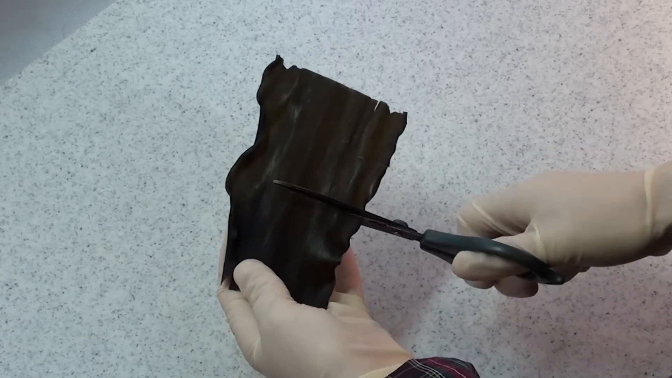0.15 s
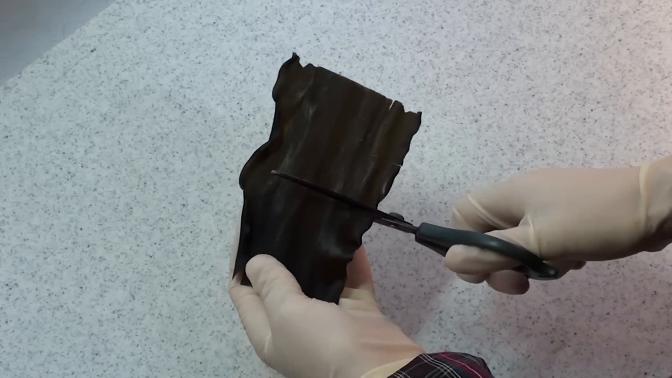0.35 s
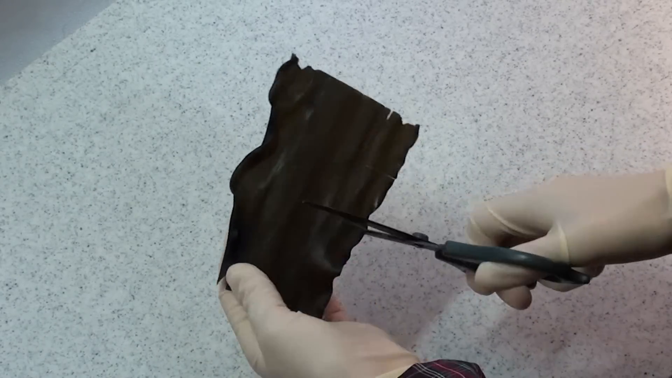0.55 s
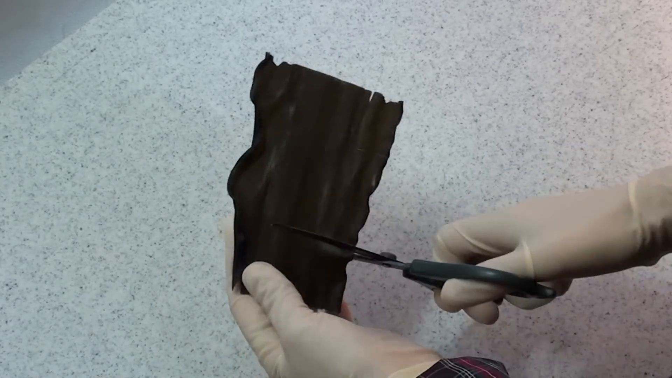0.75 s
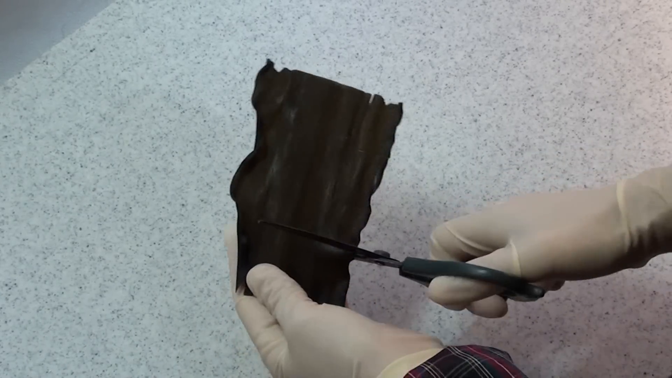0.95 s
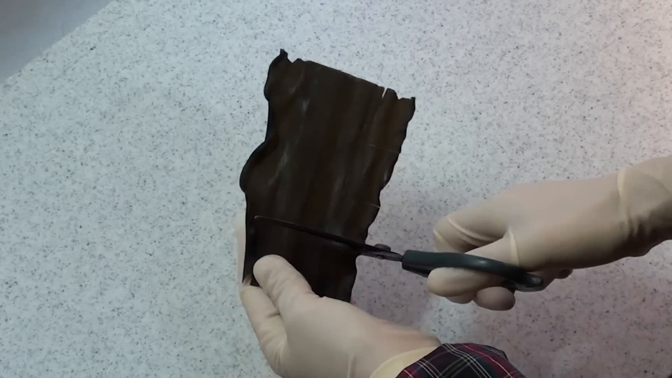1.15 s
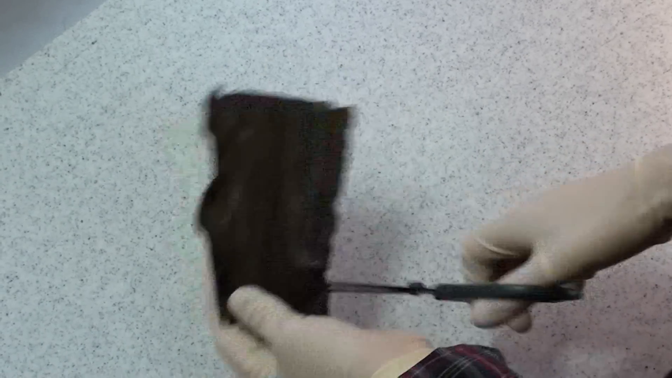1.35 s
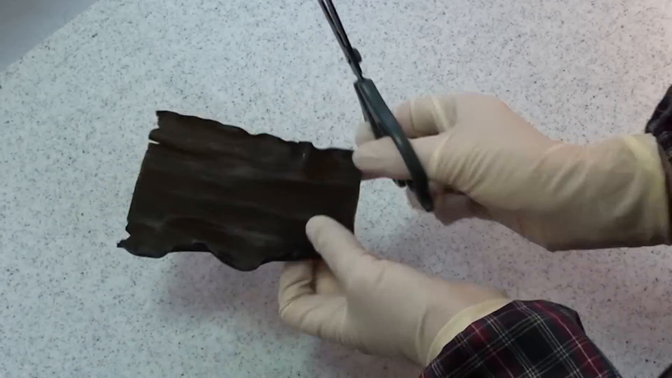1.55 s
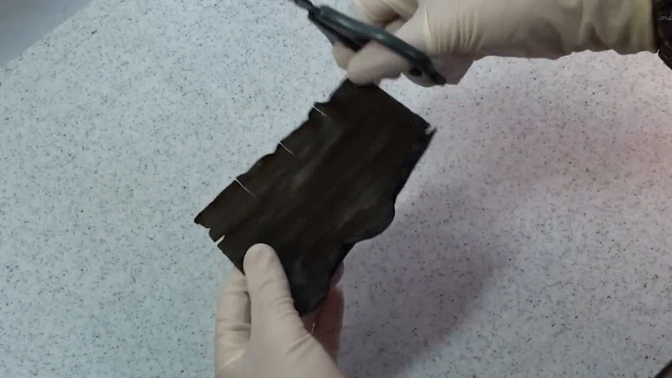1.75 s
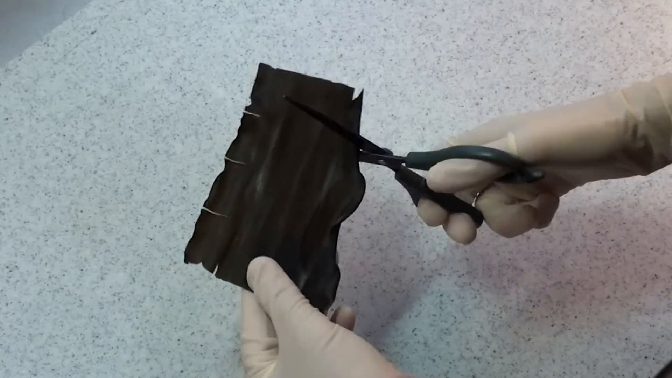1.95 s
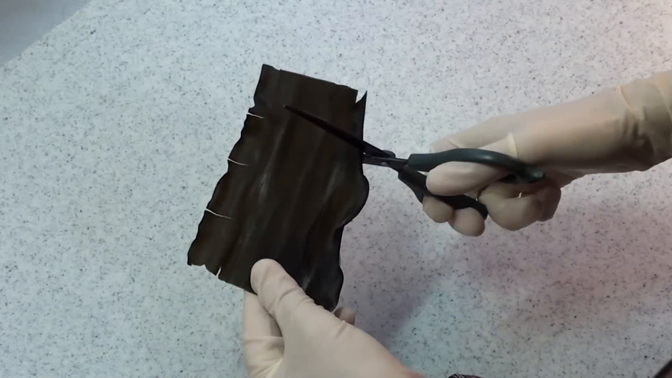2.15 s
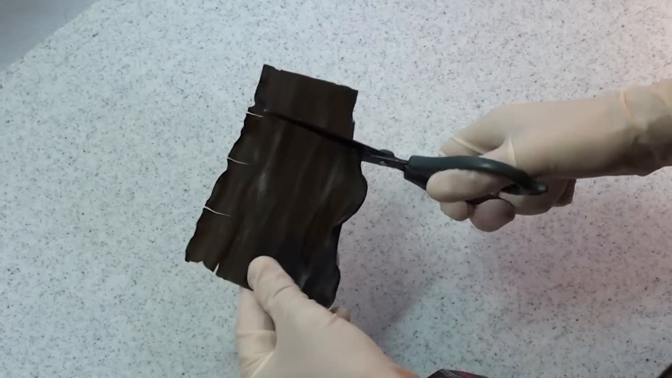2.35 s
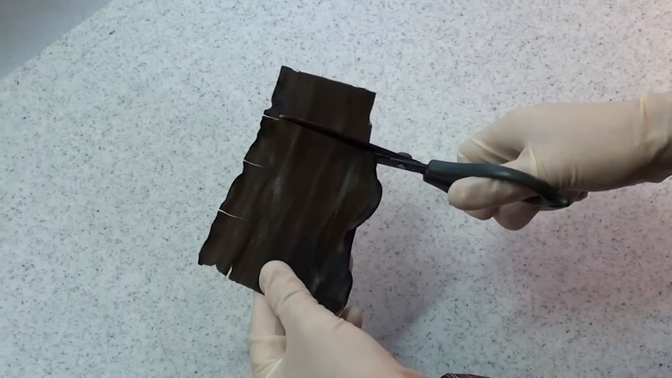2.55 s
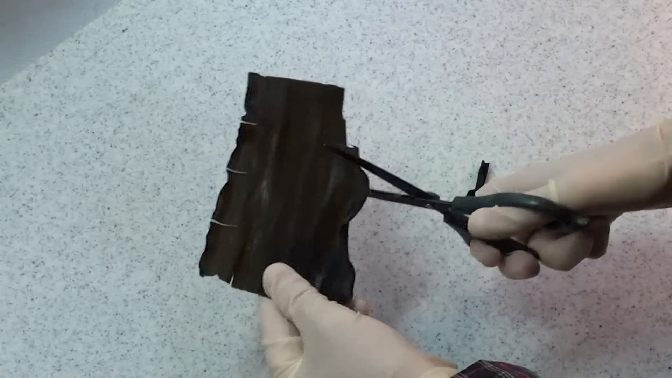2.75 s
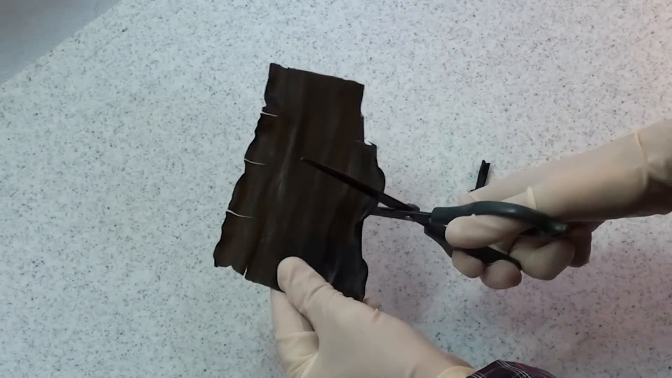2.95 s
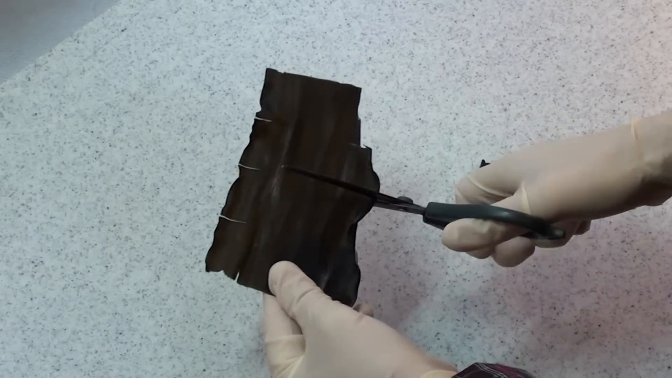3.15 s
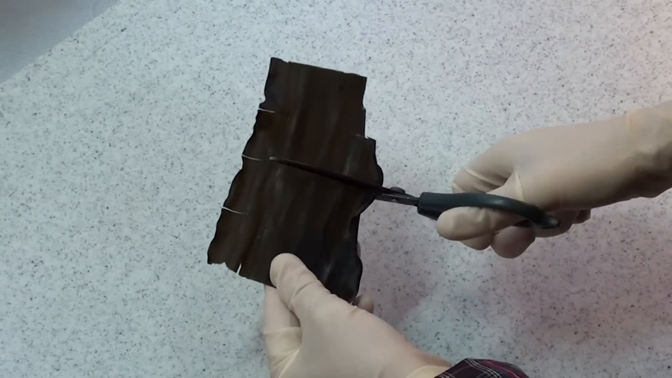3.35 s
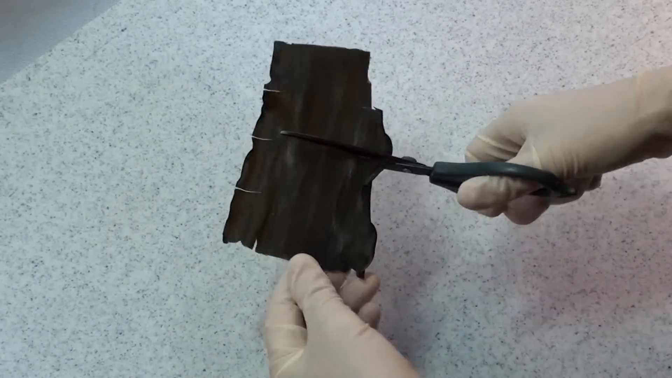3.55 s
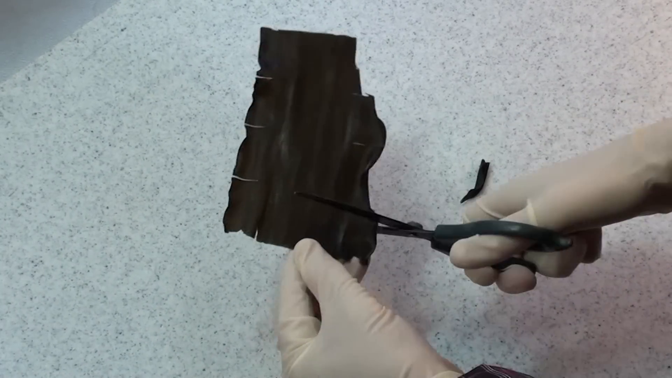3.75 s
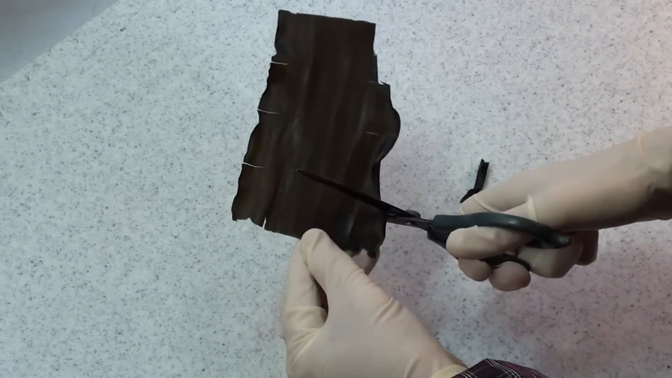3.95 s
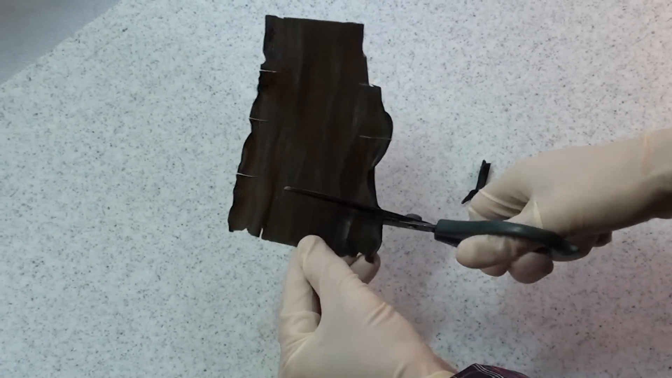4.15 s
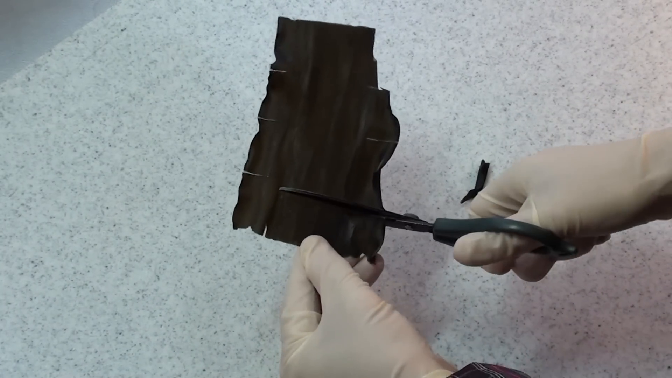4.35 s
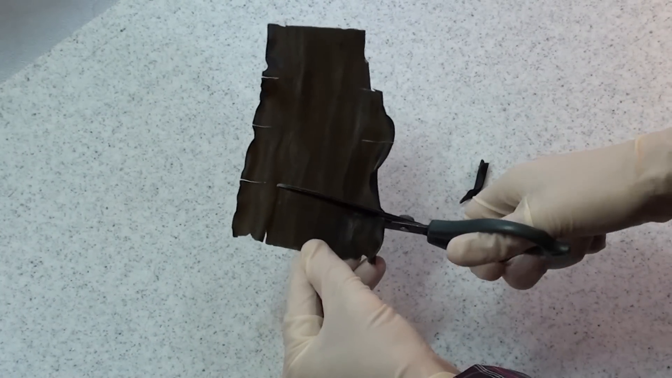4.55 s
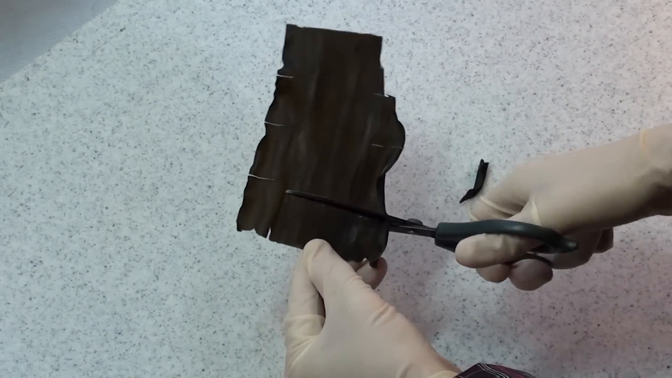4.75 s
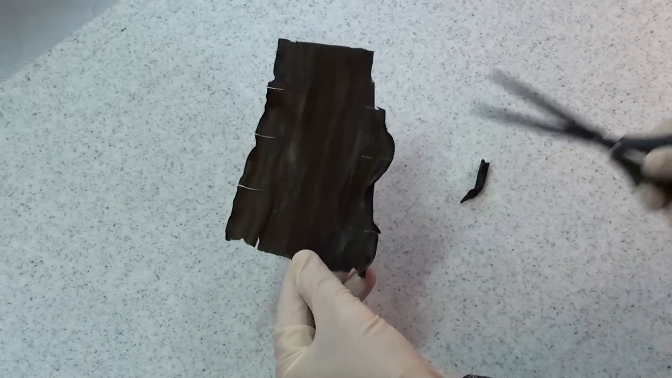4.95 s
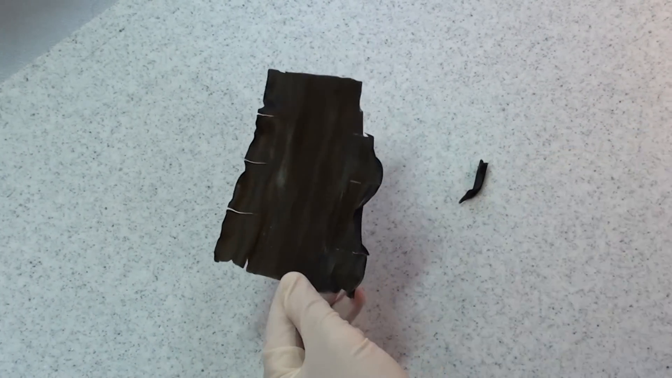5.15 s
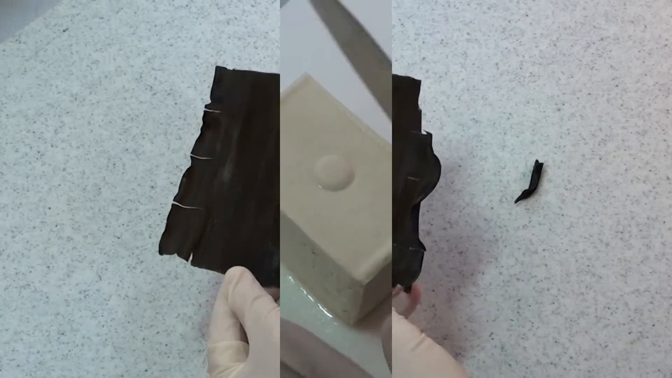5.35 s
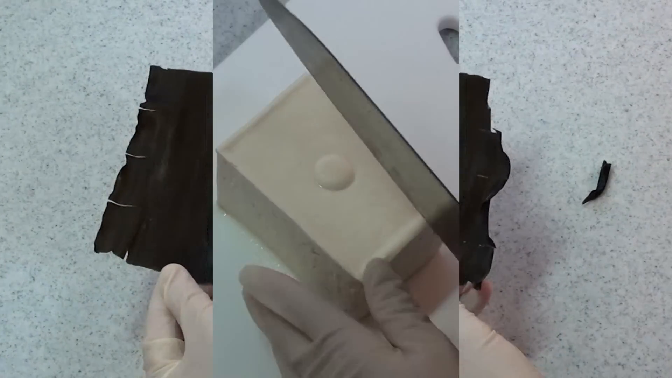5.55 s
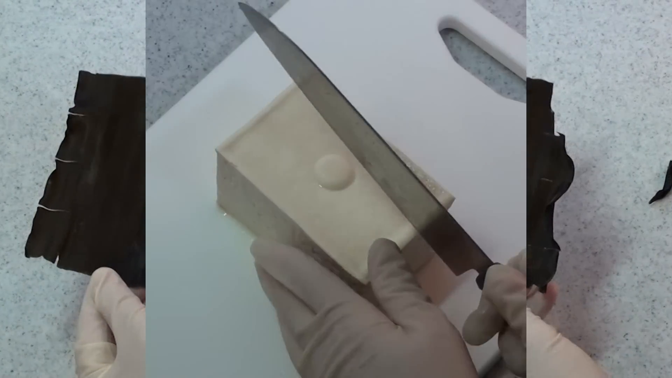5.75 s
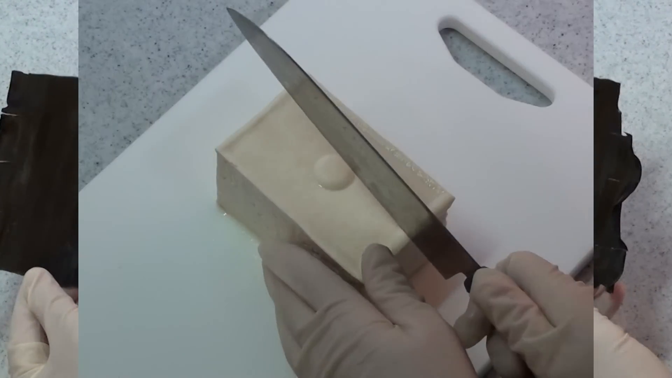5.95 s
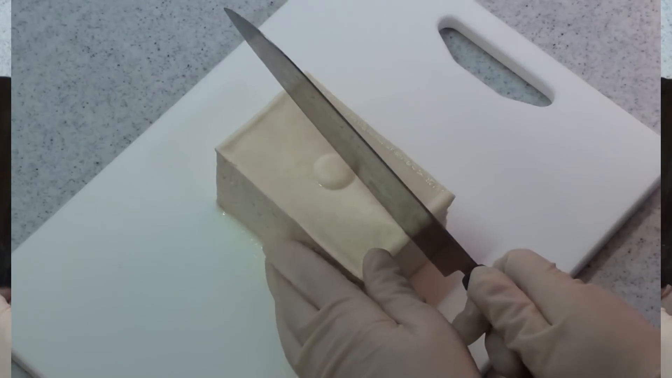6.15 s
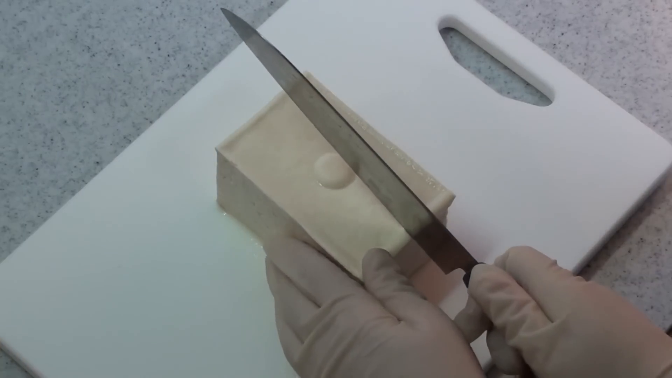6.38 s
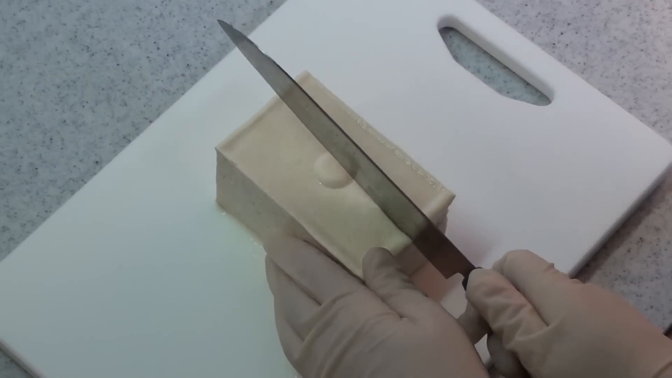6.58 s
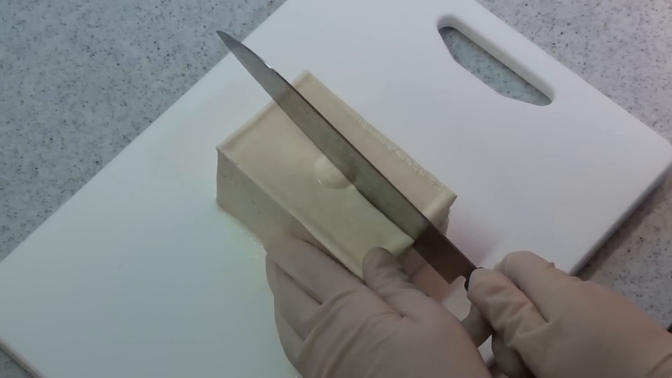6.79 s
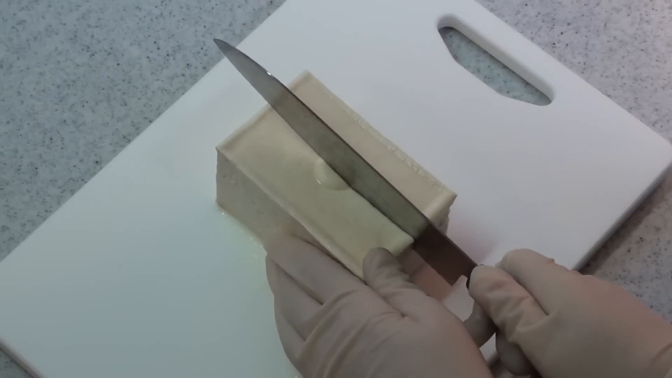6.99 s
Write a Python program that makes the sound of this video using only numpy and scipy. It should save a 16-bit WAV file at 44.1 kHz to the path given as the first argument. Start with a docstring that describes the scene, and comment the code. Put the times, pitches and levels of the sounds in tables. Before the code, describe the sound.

Scissors snip stiff dried kelp in crisp irregular clicks and crackles over quiet kitchen hum and hiss, then a brief slide and knock on a board.

```python
"""A kitchen, scissors and stiff dried kelp at close range to a camera's stereo microphone.
Fibres crack in clusters: bursts of micro-snaps ring the blades and the sheet, which rustles in the gloves.
A fridge hums and a thin whine stands over the microphone hiss, built from sines and coloured noise.
After a cut to a new shot the room is fuller in the bass; something slides over a cutting board as noise,
and knocks ring the board twice before a last light click."""
import sys
import numpy as np
from scipy import signal
from scipy.fft import rfft, irfft, next_fast_len
from scipy.io import wavfile
from scipy.ndimage import uniform_filter1d, map_coordinates

SR = 44100
rng = np.random.default_rng(int(sys.argv[2]) if len(sys.argv) > 2 else 0)


def waveform_to_disk(signal):
    """Save audio, clipped to [-1, 1], as 16-bit WAV at the path in sys.argv[1]."""
    frames = np.transpose(np.atleast_2d(signal))
    scaled = np.clip(frames, -1, 1) * 32767
    samples = np.round(scaled).astype(np.int16)
    wavfile.write(sys.argv[1], SR, samples)


def makeup_ratio(level_db):
    """Linear amplitude ratio for a level in decibels (20 dB per factor of ten)."""
    decades = np.asarray(level_db, float) / 20
    return 10 ** decades


N = 309582  # length in samples

# clear cracks: [t/s, blade knock level/dB, snap level/dB, fizz level/dB, length/ms], levels before the tilt
CRACKS = [(0.1386, -46, -51.5, -61, 3.5), (0.1671, -49.5, -62, -65, 1.5), (0.2163, -57, -60.5, -80, 4.7),
          (0.2693, -48, -53, -82, 2.3), (0.316, -47, -55, -62, 9.3), (0.321, -54, -48, -50, 5.6),
          (0.4846, -79, -53, -50, 3.8), (0.5431, -65, -29, -30, 1.15), (0.5448, -30, -35.5, -39, 2.4),
          (0.6251, -63, -42.5, -42, 3.3), (0.6695, -52, -61, -45, 1.9), (0.7208, -32, -31, -29.5, 1.13),
          (0.8247, -34.5, -54, -66, 1.27), (1.021, -33.5, -28.5, -23.5, 2.4),
          (1.0314, -39.5, -31, -52, 8.5), (1.0364, -26, -42, -20, 2), (1.0398, -46, -28, -46, 2.5),
          (1.0554, -61, -60, -46, 8.6), (1.0857, -29.5, -30.5, -34, 1.76), (1.146, -50.5, -55, -64, 6.5),
          (1.154, -48.5, -49, -70, 12), (1.2117, -33, -51, -41, 4.2), (1.2188, -37, -36.5, -69, 2.6),
          (1.2293, -34.5, -47, -52, 3.1), (1.236, -46, -51, -61, 4), (1.2598, -58, -32, -56, 2.3),
          (1.2652, -29.5, -54, -35, 1.7), (1.306, -36, -39, -44, 2.7), (1.3754, -46, -46, -71, 2.6),
          (1.388, -41.5, -49, -57, 1.7), (1.3914, -50, -47.5, -43, 5.3), (1.419, -58, -63, -49, 9),
          (1.4434, -50, -46, -50, 1.7), (1.4569, -49, -53, -44, 1.8), (1.5293, -55, -45.5, -45, 2.3),
          (1.5538, -64, -63, -56, 8.2), (1.6166, -43.5, -42.5, -45, 1.3), (1.6345, -48, -55, -60, 1.9),
          (1.658, -42.5, -50.5, -43, 2.35), (1.8232, -49, -47, -38, 1.1), (1.8622, -77, -59, -48, 4),
          (1.993, -51, -47, -62, 3.3), (1.9997, -42, -40.5, -63, 1.54), (2.0067, -47, -39, -74, 1.8),
          (2.0629, -44, -51, -73, 0.93), (2.126, -30, -31, -41, 1.8), (2.1588, -54, -53, -86, 9),
          (2.2594, -55, -46.5, -49, 2.5), (2.2995, -49, -46, -30, 2.6), (2.302, -33.5, -34.5, -18, 2.7),
          (2.3045, -47, -37, -41, 6.2), (2.316, -21.5, -20, -17, 1.4), (2.323, -30.5, -29.5, -28, 5.8),
          (2.3288, -44, -47, -41, 12.5), (2.382, -49, -34.5, -28, 2.6), (2.387, -71, -52, -40, 1.2),
          (2.4112, -80, -45, -43, 1.4), (2.4214, -68, -45, -45, .9), (2.446, -68, -51, -68, 4.2),
          (2.4623, -61, -45, -35, 2.1), (2.4982, -40, -44, -32, 1.16), (2.5924, -61, -58, -72, 1.6),
          (2.7266, -73, -41, -69, .6), (2.7367, -45, -47.5, -45, 6), (2.848, -64, -53, -45, 1.8),
          (2.871, -66, -58, -47, 4.8), (3.114, -73, -57, -57, 13), (3.1256, -79, -48, -45, 3.3),
          (3.1296, -34, -41.5, -53, 1.04), (3.2188, -70, -44, -54, .9), (3.2226, -44, -42.5, -36, 2.5),
          (3.2517, -53, -44, -39, 1.3), (3.2603, -48, -42, -34, 1.6), (3.3206, -48, -44.5, -67, 7.4),
          (3.331, -70, -52, -70, 12), (3.619, -39, -47, -53, 1.76), (3.6323, -59, -49, -64, 4.2),
          (3.847, -50, -48.5, -78, 2.6), (3.864, -58, -54, -60, 5), (3.8797, -56, -48, -65, 2.3),
          (3.9074, -58, -53, -76, 5.4), (3.9294, -50, -49, -76, 1), (3.9788, -47, -48, -53, 0.99),
          (4.1313, -59, -45, -32, .64), (4.1454, -57, -48, -51, 1.3), (4.1895, -72, -38, -43, 1.1),
          (4.2213, -54.5, -54, -67, 4.2), (4.3221, -67, -59, -56, 2.5), (4.348, -55, -47, -19, 1.1),
          (4.3495, -37.5, -36.5, -23, 1.14), (4.4317, -47, -30.5, -19, 2.2), (4.4342, -62, -50, -45, 4.6),
          (4.511, -38, -30.5, -35, 1.65), (4.5645, -76, -54, -69, 1.6), (4.62, -48.5, -52, -79, 1.9),
          (4.786, -49.5, -48.5, -92, 4.7)]
# ringing modes of blades and kelp sheet: [f/Hz, width/Hz, level/dB], before scatter and detuning
BLADE_MODES = [(1620, 213, 3.5), (2250, 360, -2.5), (2276, 190, -9), (3010, 184, -5.5), (3763, 110, -2),
               (4490, 114, -3.5), (5660, 190, -4), (6320, 104, 1.5), (7120, 260, -13.5), (7770, 130, -6),
               (9260, 360, -2.5), (10380, 250, -4), (13250, 160, -21.5), (15700, 430, -7)]
# the stiff sheet knocks in the glove: [t/s, level/dB], before the tilt
THUDS = [(0.315, -58), (0.551, -45.5), (0.721, -51), (0.825, -50), (1.021, -60), (1.04, -56), (1.228, -53),
         (1.805, -45), (1.991, -53), (2.125, -41.5), (2.301, -51), (2.316, -48), (2.33, -50.5),
         (2.738, -49), (3.129, -51), (3.619, -52), (4.432, -49), (4.622, -52)]
# ringing modes of the held sheet: [f/Hz, width/Hz, level/dB], before scatter and detuning
SHEET_MODES = [(700, 250, -3), (880, 220, -1.5), (1100, 280, -1.5), (1400, 350, -3)]
# the sheet bends and rubs in the gloves: [t/s, level/dB], before the gate at the lowest level
RUSTLE_LEVEL = [(0.0, -63), (0.68, -59.5), (1.09, -66), (1.3, -62), (1.42, -55.5), (1.55, -54.5),
                (1.7, -58), (1.96, -62), (2.29, -59.5), (3.2, -62.5), (4.42, -61), (5.2, -61.5)]
# rubbing as the camera delivers it, its steep treble cut near 14.4 kHz included:
# [f/Hz, relative level/dB per Hz]
RUB_DELIVERED = [(600, -15.5), (900, 3), (1600, -3), (5000, -3.5), (14300, -3), (14700, -71)]
# hiss of the slide over the board: [t/s, level/dB], before flutter
SLIDE_LEVEL = [(5.239, -59), (5.25, -52), (5.33, -51.5), (5.47, -50.5), (5.58, -56), (5.66, -54),
               (5.73, -66), (5.95, -69)]
# sliding hiss as the camera delivers it, the same treble cut included: [f/Hz, relative level/dB per Hz]
HISS_DELIVERED = [(2500, -5), (4000, -3.5), (7200, 2), (9500, -6.5), (14200, -20), (14500, -70)]
# colour of the low drag under the hiss: [f/Hz, relative level/dB per Hz]
DRAG_COLOUR = [(80, -39), (200, -2), (1700, 2), (3000, -14), (5000, -42), (9000, -70)]
# knocks on the board: [t/s, thud level/dB, knock level/dB, click level/dB, length/ms], before the tilt
KNOCKS = [(5.608, -49, -38, -35.5, 4), (5.6102, -43, -38, -47, 3.1), (5.823, -47, -62, -80, 6.5),
          (5.839, -50.5, -76, -91, 5.9), (5.859, -56, -76, -80, 14), (6.879, -90, -68, -46.5, 2)]
# ringing modes of the board: [f/Hz, width/Hz, level/dB], before scatter and detuning
BOARD_MODES = [(316, 52, 3.5), (443, 36, -2), (805, 130, -4), (1030, 130, -3), (1570, 105, 0.5),
               (1800, 120, -3.5), (2500, 360, 0), (3750, 270, 4), (4930, 380, -23), (6050, 320, 6),
               (7100, 570, 3.5)]
# decay of the kitchen's echo: [f/Hz, t60/s]
KITCHEN_DECAY = [(500, 0.073), (2300, 0.06), (7000, 0.07), (15000, 0.049)]
# room noise as the camera delivers it, the same treble cut included, one list for each shot:
# [f/Hz, relative level/dB per Hz]
AIR_DELIVERED = ([(25, -52), (140, -20), (233, -14), (389, -16.5), (703, -12.5), (1270, -15), (3340, -16),
                 (7700, -21.5), (14250, -26), (14500, -76)], [(15, -41), (25, -24), (91, -11), (227, -11.5),
                 (421, -12), (2360, -18.5), (4620, -21), (12500, -25), (14250, -23.5), (14500, -80)])
# room noise level of each shot: [rms level/dB], before the room gain and channel balance
AIR_LEVEL = -59.5, -58.5
# stereo width of the room noise, one list for each shot: [f/Hz, left-right likeness]
AIR_LIKENESS = [(60, 0.82), (180, 1), (550, 0.72), (1650, 0.028), (4970, 0.04), (15000, 0.38)], [(60, 0.99),
                (180, 0.81), (550, 0.021), (1650, 0.07), (4970, 0.79), (15000, 1)]
# steady tones, one list for each shot: [f/Hz]
TONE_PITCHES = [90, 269.7, 332, 360, 720, 2519, 7556], [90.3, 271, 840, 1680, 2519, 4603]
# the same tones, one list for each shot: [rms level/dB, waver/dB], before the room gain and channel balance
TONE_LEVELS = ([(-84.5, 0.4), (-68, 0.17), (-79.5, 2.3), (-78.5, 2.3), (-80.5, 0.39), (-81.5, 1.2),
               (-71, 1.3)], [(-71, 6.2), (-78.5, 0.7), (-79.5, 1.6), (-84, 2.1), (-72.5, 0.32), (-83, 3)])
# gain of the whole room tone, a gentle drift, then a quick lift at the cut: [t/s, gain/dB]
ROOM_GAIN = [(0, 0), (1.5, 1.45), (4, 0.5), (5.2, 0.3), (5.3, 4), (7.02, 1.3)]

CUT_S, GAP_S = 5.231, 0.0045  # end of the first shot, silence before the second fades in
SPAN = 4096  # samples rendered for one contact
MAIN_SNAP_MS = 1.6  # contact length at which the main snap matches all the others together
FIZZ_IN_TREBLE = 0.21  # how far the treble leans from the snap toward the fizz
SPLINTER_COUNT, SPLINTER_DB = 28, -67  # mean level of each band, before the tilt
SPLINTER_SCATTER_DB, SPLINTER_MS = 5, 4  # scatter of each band, median length
DRAG_DB, DRAG_SWING = -59.5, 0.58  # drag at the loudest hiss; share of the hiss's dB swing it follows


def scissors():
    """Every crack has its own balance of blade knock, snap and fizz; some thuds shake the whole sheet."""
    out = np.zeros(N + SPAN)
    for s, knock_db, snap_db, fizz_db, ms in [*CRACKS, *splinters()]:
        treble_db = snap_db + FIZZ_IN_TREBLE * (fizz_db - snap_db)
        tilt = [(150, knock_db - 37), (500, knock_db - 10), (1300, knock_db - 5), (2300, knock_db + 15),
                (4600, snap_db + 13), (10000, treble_db + 13.5),
                (14500, fizz_db + 19.5), (16400, fizz_db - 11), (17500, fizz_db - 50)]
        crack = strike(ms, BLADE_MODES, tilt, spiky=5, direct_db=-10, scatter_db=3)
        out[round(s * SR) - 12:][:SPAN] += crack
    for s, db in THUDS:
        tilt = [(300, db - 25), (650, db + 10), (1200, db + 12.5), (2500, db - 41)]
        thud = strike(4.1, SHEET_MODES, tilt, spiky=2.3, direct_db=-18, scatter_db=5)
        out[round(s * SR):][:SPAN] += thud
    return out[:N]


def splinters():
    """Faint cracks, as rows like CRACKS, fall by chance, more often where the sheet rubs harder."""
    level_db, = curves(RUSTLE_LEVEL)
    share = np.cumsum(makeup_ratio(1.9 * level_db[:round(CUT_S * SR) - SPAN]))
    draw = rng.random((SPLINTER_COUNT, 1))
    s = 0.01 + np.searchsorted(share, draw * share[-1]) / SR
    scatter = rng.standard_normal((SPLINTER_COUNT, 4))
    bands_db = SPLINTER_DB + SPLINTER_SCATTER_DB * scatter[:, :3]
    length_ms = SPLINTER_MS * np.exp(0.5 * scatter[:, 3:])
    return np.hstack([s, bands_db, length_ms])


def strike(length_ms, modes, tilt, spiky, direct_db, scatter_db):
    """One contact: uneven micro-snaps that swell fast and die away, ringing the modes at new strengths."""
    t, hz = np.arange(SPAN) / SR, np.fft.rfftfreq(SPAN, 1 / SR)
    u = t / (length_ms / 1000)
    shape = (1 - np.exp(-u / 0.14)) * np.exp(-u / 1.07)
    sizes = np.minimum(rng.exponential(size=SPAN), 3)
    snaps = shape * rng.standard_normal(SPAN) * makeup_ratio(spiky * sizes)
    # one sharp snap at the top of the swell, weaker in long tearing contacts
    snaps[np.argmax(shape)] = MAIN_SNAP_MS / length_ms * np.linalg.norm(snaps)
    drive = rfft(snaps)
    # however the snaps fall, they drive every broad band with the same energy
    drive *= np.linalg.norm(shape) / np.sqrt(uniform_filter1d(np.abs(drive) ** 2, size=70))
    centre, width, db = np.transpose(modes)[:, :, None]
    strength, detune = rng.standard_normal((2, len(modes), 1))
    # grip and opening shift the modes a little
    centre = centre * (1 + 0.025 * detune)
    resonance = 1j * hz * width / (centre ** 2 - hz ** 2 + 1j * hz * width)
    rings = makeup_ratio(db + scatter_db * strength) * resonance
    body = makeup_ratio(direct_db) + rings.sum(axis=0)
    # the tilt is made causal through its cepstrum
    cepstrum = irfft(np.log(makeup_ratio(along(tilt, hz))))
    cepstrum[1:SPAN // 2] *= 2
    cepstrum[SPAN // 2 + 1:] = 0
    return irfft(drive * body * np.exp(rfft(cepstrum)))


def rustle():
    """Fine grit from the bent sheet, noise in small clumps, until the cut."""
    level_db, = curves(RUSTLE_LEVEL)
    over_db = np.clip(level_db - np.min(level_db), 0, None)
    gate = np.sqrt(1 - makeup_ratio(-2 * over_db))  # silent at the lowest level
    grit = makeup_ratio(3 * wobble(35)) * rush(RUB_DELIVERED, [(1000, 0.85)])
    first_shot = np.arange(N) < CUT_S * SR
    return first_shot * makeup_ratio(level_db) * gate * unit(grit)


def board_slide():
    """Friction on the board: fluttering hiss, with a low drag that follows part of its swing."""
    before, after = (SLIDE_LEVEL[0][0] - 0.004, -140), (SLIDE_LEVEL[-1][0] + 0.1, -140)
    hiss_db, = curves([before, *SLIDE_LEVEL, after])
    drag_db = DRAG_DB + DRAG_SWING * (hiss_db - hiss_db.max())
    hiss = makeup_ratio(hiss_db + 1.8 * wobble(30)) * rush(HISS_DELIVERED, [(5000, 0.91)])
    drag = makeup_ratio(drag_db + 1.2 * wobble(25)) * rush(DRAG_COLOUR, [(1000, 0.66)])
    return hiss + drag


def board_knocks():
    """Short contacts ring the board's modes, each with its own balance of thud, knock and click."""
    out = np.zeros(N + SPAN)
    for s, thud_db, knock_db, click_db, ms in KNOCKS:
        tilt = [(150, thud_db), (350, thud_db + 14), (1200, thud_db + 22.5), (2600, knock_db + 17.5),
                (5500, click_db + 12), (8500, click_db - 15), (14000, click_db - 52)]
        knock = strike(ms, BOARD_MODES, tilt, spiky=2.5, direct_db=-14, scatter_db=1.5)
        out[round(s * SR):][:SPAN] += knock
    return out[:N]


def kitchen(x):
    """Counter and walls answer with decaying noise; the tail is drawn anew for each half second."""
    out, step = np.zeros((2, N + 2 * SR)), SR // 2
    for start in range(0, N, step):
        hz, t, z = signal.stft(rng.standard_normal((3, SR // 4)), SR, nperseg=128)
        decay = makeup_ratio(-60 * t / along(KITCHEN_DECAY, hz)[:, None])
        left, right, both = signal.istft(z * decay, SR, nperseg=128)[1]
        tail = rfft([both + 0.61 * left, both + 0.97 * right])
        # the echo keeps the broad colour of the contact
        tail = irfft(tail / np.sqrt(uniform_filter1d(np.abs(tail) ** 2, size=120)))
        wet = signal.fftconvolve(x[None, start:start + step], tail, axes=1)
        out[:, start + 40:start + 40 + wet.shape[1]] += wet  # 40 samples of pre-delay
    return out[:, :N]


def room_tone():
    """Hiss and rumble with slightly wavering tones; a short silence parts the two shots."""
    t = np.arange(N) / SR
    shots = []
    for spectrum, air_db, alike, pitches, levels in zip(
            AIR_DELIVERED, AIR_LEVEL, AIR_LIKENESS, TONE_PITCHES, TONE_LEVELS):
        hum = np.zeros(N)
        for hz, (db, waver) in zip(pitches, levels):
            level = makeup_ratio(db + waver * wobble(11)) * np.sqrt(2)  # rms to peak
            phase = 2 * np.pi * (hz * t + rng.random()) + 0.053 * waver * wobble(15)
            hum += level * np.sin(phase)
        air = makeup_ratio(air_db) * rush(spectrum, alike)
        shots.append(makeup_ratio([[-0.3], [0.3]]) * (air + hum))  # left, right gain in dB
    first = np.clip((CUT_S - t) / 0.0014, 0, 1)
    second = np.clip((t - CUT_S - GAP_S) / 0.0047, 0, 1)
    return makeup_ratio(curves(ROOM_GAIN)[0]) * (first * shots[0] + second * shots[1])


def rush(spectrum, alike):
    """Stereo noise of rms 1 with a given spectrum and left-right likeness, mixed from mid and side."""
    m = next_fast_len(N)
    hz = np.fft.rfftfreq(m, 1 / SR)
    turn = np.arccos(np.clip(along(alike, hz), -1, 1)) / 2
    noise = rfft(rng.standard_normal((2, m))) * makeup_ratio(along(spectrum, hz))
    mid, side = irfft(noise * [np.cos(turn), np.sin(turn)], m)[:, :N]
    return unit(np.array([mid + side, mid - side]))


def wobble(rate):
    """A smooth random curve, rate knots a second (39 at most)."""
    knots = rng.standard_normal(int(N * 40 / SR) + 4)
    return map_coordinates(knots, [np.arange(N) * min(rate, 39) / SR])


def curves(rows):
    """One value per sample for each column after the time."""
    s, *cols = np.transpose(rows)
    return [np.interp(np.arange(N) / SR, s, c) for c in cols]


def along(points, hz):
    """(Hz, value) points read on a log frequency axis."""
    f, v = np.transpose(points)
    return np.interp(np.log(hz + 1), np.log(f + 1), v)


def unit(x):
    """Scaled to rms 1."""
    return x / np.sqrt(np.mean(x ** 2) + 1e-20)


def scene():
    """Near contacts reach the left port a fraction of a sample early; then echo, friction and room tone."""
    cuts = scissors()
    knocks = board_knocks()
    hits = cuts + knocks
    late = 0.1  # samples by which the right port lags
    near = np.array([hits, (1 - late) * hits + late * np.roll(hits, 1)])
    near = near * makeup_ratio([[0.2], [-0.2]])  # left, right gain in dB
    echo = makeup_ratio(-5) * kitchen(cuts + makeup_ratio(-2.5) * knocks)
    return near + echo + rustle() + board_slide() + room_tone()


def top_cut(x):
    """Nothing passes above the cut-off."""
    return signal.sosfilt(signal.butter(12, 17010, fs=SR, output="sos"), x)


def record(dry):
    """The finished stereo mix as the camera stores it."""
    return top_cut(dry)


dry = scene()
out = record(dry)
waveform_to_disk(out)
```